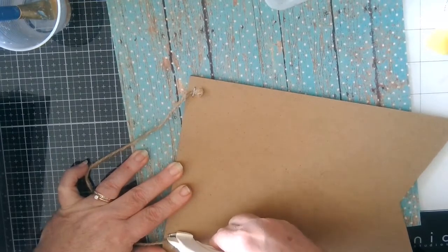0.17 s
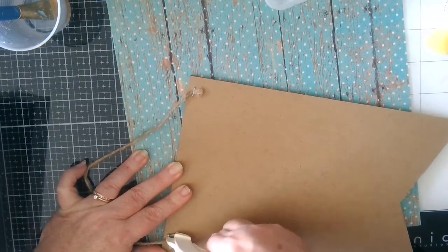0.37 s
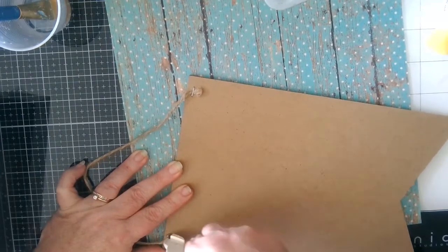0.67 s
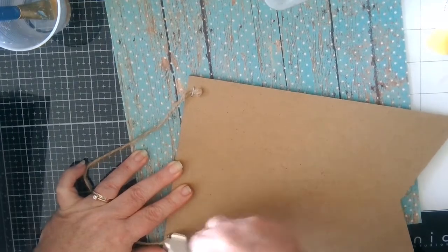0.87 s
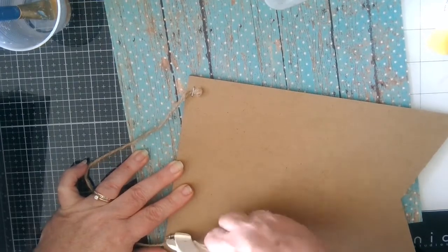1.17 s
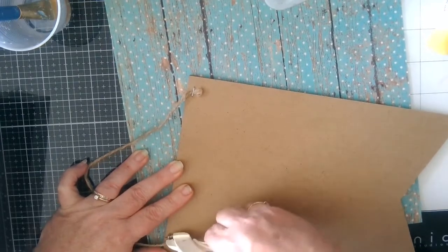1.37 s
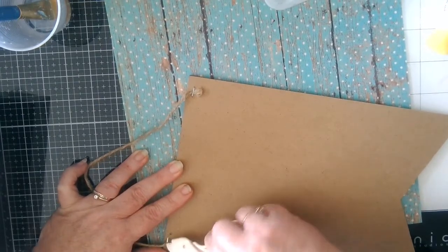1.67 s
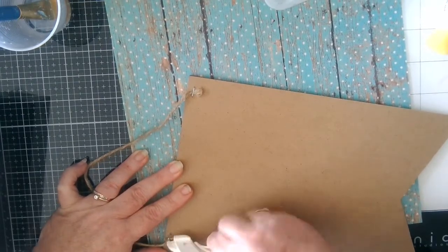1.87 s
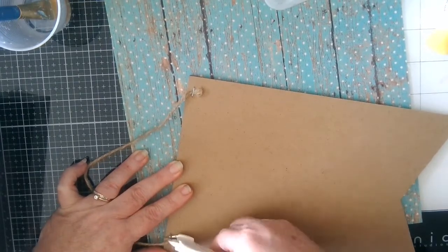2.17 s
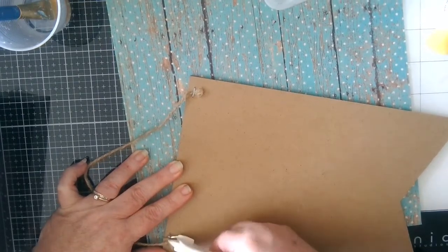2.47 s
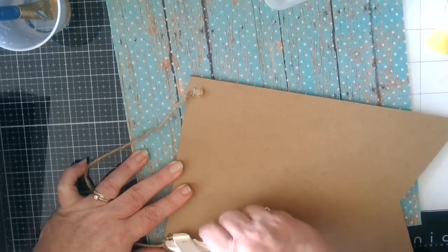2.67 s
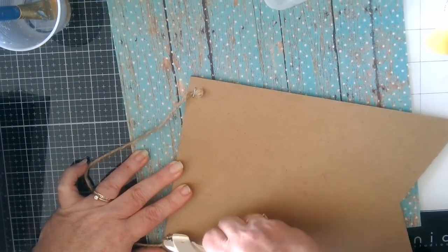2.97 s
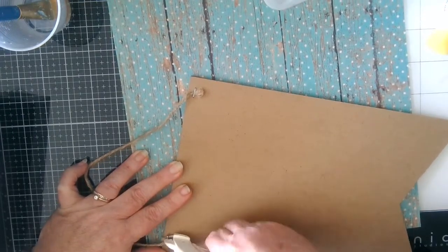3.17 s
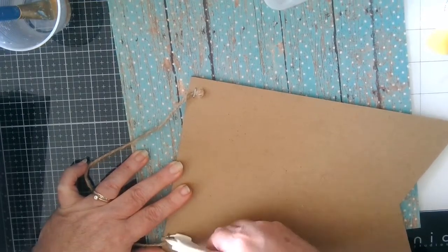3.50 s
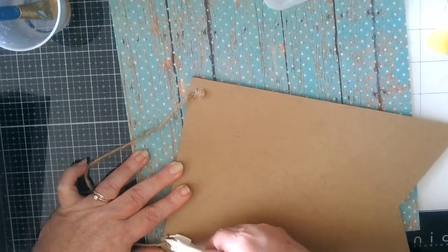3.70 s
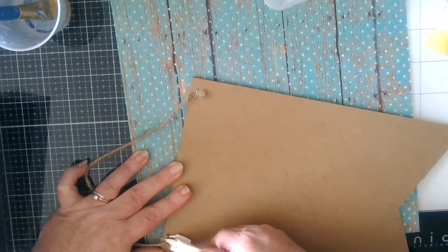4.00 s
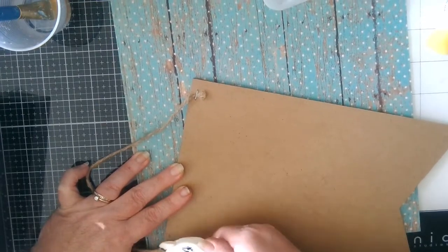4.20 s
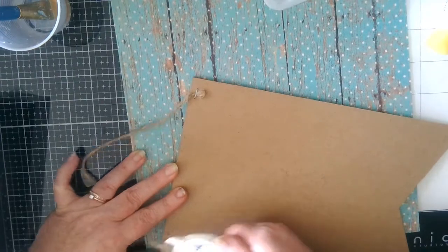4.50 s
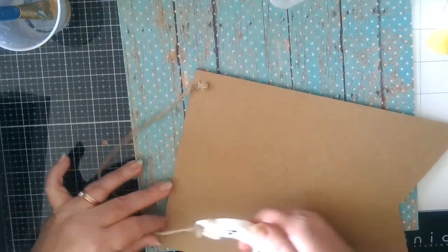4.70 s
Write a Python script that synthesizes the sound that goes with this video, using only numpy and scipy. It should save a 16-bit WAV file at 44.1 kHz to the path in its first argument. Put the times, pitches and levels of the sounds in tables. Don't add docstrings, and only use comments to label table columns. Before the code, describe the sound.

A metal hand tool knocks, taps and ticks against a thin board on a table, then a staple springs loose with one loud crack.

```python
import sys
import numpy as np
from scipy import signal
from scipy.fft import rfft, irfft, next_fast_len
from scipy.io import wavfile
from scipy.ndimage import map_coordinates

SR = 44100
rng = np.random.default_rng(int(sys.argv[2]) if len(sys.argv) > 2 else 0)


def unload_wav(signal):
    wavfile.write(
        sys.argv[1],
        SR,
        np.round(np.clip(np.atleast_2d(signal).T, -1, 1) * 32767).astype(np.int16),
    )


def ratio_of_db(decibels):
    return 10 ** (np.asarray(decibels, float) / 20)


N = 213796
T = np.arange(N) / SR


def unit(x):
    return x / np.sqrt(np.mean(x ** 2) + 1e-20)


def along(points, hz):
    point_hz, value = np.transpose(points)
    return np.interp(np.log(hz + 1), np.log(point_hz + 1), value)


def wobble(rate_hz):
    return map_coordinates(rng.standard_normal(int(N * rate_hz / SR) + 4), [T * rate_hz])


def filtered(x, response):
    size = next_fast_len(N + SR // 2)
    hz = np.fft.rfftfreq(size, 1 / SR)
    return irfft(rfft(x, size) * response(hz), size)[:N]


def resonant(x, peaks):
    def response(f):
        total = 0
        for k, (centre, width, db) in enumerate(peaks):
            damping = 1j * f * width
            total = total + (-1) ** k * ratio_of_db(db) * damping / (centre * centre - f * f + damping)
        return total
    return filtered(x, response)


def housing(x, peaks):
    return resonant(resonant(x, peaks), peaks)


def noise(spectrum):
    return unit(filtered(rng.standard_normal(N), lambda hz: ratio_of_db(along(spectrum, hz))))


def add(track, start_s, sound):
    part = track[round(start_s * SR):][:len(sound)]
    part += sound[:len(part)]


def strokes(rows, rest_db, rise_db_s, fall_db_s):
    levels = [np.full(N, rest_db)]
    for start_s, hold_s, db in rows:
        before_s = np.clip(start_s - T, 0, None)
        after_s = np.clip(T - start_s - hold_s, 0, None)
        levels.append(db - rise_db_s * before_s - fall_db_s * after_s)
    return np.max(levels, axis=0)


def burst(length_s):
    t = np.arange(SR // 8) / SR
    return rng.standard_normal(len(t)) * ratio_of_db(-15 * t / abs(length_s)) * (1 - np.exp(-t / .0005))


# pitch_hz, level_db, t60_s
BOARD_MODES = [(328, -3.5, 0.072), (460, -9, 0.017), (598.7, 0, 0.098), (689.4, 14.5, 0.035),
               (755, 5, 0.053), (863, 1, 0.15), (1020, 9, 0.058), (1020, -8.5, 0.032), (1280, -7.5, 0.12),
               (1870, -26, 0.067)]


def knock(centre_hz, thud_db, tilt_db):
    t = np.arange(SR // 5) / SR
    thump = np.sin(2 * np.pi * .92 * centre_hz * t) * (t / .00075) ** 2 * np.exp(-t / .00075)
    thump = thump + .6 * np.pad(thump, (round(.0072 * SR), 0))[:len(t)]
    ring = 0
    for hz, db, t60_s in BOARD_MODES:
        level_luck, phase_luck = rng.standard_normal(2)
        octaves_off = abs(np.log2(hz / centre_hz))
        mode_db = db + 4.28 * level_luck - tilt_db * octaves_off - 60 * t / t60_s
        ring = ring + ratio_of_db(mode_db) * np.sin(2 * np.pi * hz * t + 1.53 * phase_luck)
    blow = thump + 0.17 * ring * (1 - np.exp(-(t / 0.0015) ** 2))
    table = np.sin(2 * np.pi * 290 * t) + 0.36 * np.sin(2 * np.pi * 220 * t)
    table = ratio_of_db(thud_db - 60 * t / 0.14) * table * (1 - np.exp(-t / 0.00057))
    return blow / np.abs(blow).max() + table


# centre_hz, width_hz, level_db
HOUSING_BANDS = [(1630, 1100, -3), (3180, 510, -1), (4000, 274, 6), (5800, 320, -8), (7930, 600, -0.5),
                 (10594, 530, -4), (14800, 290, -11.5)]
# centre_hz, width_hz, level_db
OPEN_BANDS = [(12800, 2500, 0), (15000, 1500, -6)]


def steel_at_mic(dull, bright, thin):
    ringing = housing(dull, HOUSING_BANDS[:3]) + housing(bright, HOUSING_BANDS[3:5])
    ringing = ringing + housing(thin, HOUSING_BANDS[5:])
    return ringing - ratio_of_db(-25) * resonant(thin, OPEN_BANDS)


# start_s, steel_db, length_s, board_db, centre_hz
SNAP_HITS = [
    (4.0435, 2.5, 0.0061, -17, 690),
    (4.0488, -13.5, 0.0044, -9, 690),
    (4.0528, -0.5, 0.003, -8.5, 693),
    (4.056, -17, 0.011, -22, 702),
    (4.062, -14, 0.0052, -28.5, 695),
    (4.0747, -28, 0.053, -13, 760),
    (4.081, -34.5, 0.017, -15, 950),
    (4.092, -34, 0.013, -22.5, 700),
    (4.111, -35, 0.013, -48, 940),
]


def snap():
    wood, steel = np.zeros((2, N))
    for start_s, steel_db, length_s, board_db, centre_hz in SNAP_HITS:
        crack = ratio_of_db(steel_db + 7) * burst(length_s)
        add(steel, start_s, crack)
        add(wood, start_s, ratio_of_db(board_db) * knock(centre_hz, -22, tilt_db=13.5))
    return wood, steel_at_mic(ratio_of_db(-6.5) * steel, ratio_of_db(1.5) * steel, ratio_of_db(1.5) * steel)


# pitch_hz, level_db, t60_s
TABLE_TOP_MODES = [(62, -11.5, .2), (113, 0, 0.24), (171, 0, 0.23)]


def slam():
    t = np.clip(T - 4.05, 0, None)
    boom = sum(ratio_of_db(db - 60 * t / t60_s) * np.sin(2 * np.pi * hz * t) for hz, db, t60_s in TABLE_TOP_MODES)
    return ratio_of_db(-27.5) * boom * (1 - np.exp(-t / 0.002))


# start_s, peak_db, centre_hz, thud_db
FIRM_KNOCKS = [(0.2945, -28.5, 1020, -21), (0.415, -24, 987, -25), (0.532, -22.5, 960, -18.5),
               (0.595, -27.5, 1020, -24), (0.871, -32, 870, -12.5), (1.315, -29.5, 660, -21),
               (1.432, -19.5, 1007, -30), (1.541, -38.5, 960, -19), (2.541, -32.5, 980, -30),
               (2.717, -18.5, 1020, -31), (2.909, -35, 1060, -19), (2.942, -35.5, 977, -12),
               (2.961, -33, 990, -16), (3.187, -24, 798, -26), (3.374, -24.5, 848, -16),
               (3.831, -34, 738, -12.5)]
# start_s, peak_db
LIGHT_TAPS = [(0.018, -51), (0.057, -41), (0.093, -40), (0.121, -37.5), (0.141, -41), (0.179, -42),
              (0.221, -42.5), (0.447, -59), (0.939, -41), (1.048, -36.5), (1.501, -39), (1.656, -44),
              (1.784, -41.5), (1.912, -39), (2.523, -43), (2.552, -34.5), (2.622, -35.5), (2.986, -33),
              (3.034, -35.5), (3.567, -43.5), (3.604, -40.5), (3.706, -38), (3.904, -37.5), (3.946, -34),
              (4.014, -36.5), (4.634, -34)]


def blows():
    tap_hz, tap_thud_db, tap_tilt_db, knock_tilt_db = 744, -18.5, 9.5, 3.5
    rows = [(*row, knock_tilt_db) for row in FIRM_KNOCKS]
    rows += [(start_s, db, tap_hz, tap_thud_db, tap_tilt_db) for start_s, db in LIGHT_TAPS]
    wood, sharp = np.zeros((2, N))
    for start_s, db, centre_hz, thud_db, tilt_db in rows:
        edge = ratio_of_db(1.5 * (db + 30) - 45) * burst(.0025)
        add(sharp, start_s + 0.00022, edge)
        add(wood, start_s - .0004, ratio_of_db(db - 6.5) * knock(centre_hz, thud_db + 1.0, tilt_db))
    return wood + housing(sharp, [(1750, 600, -1), (3550, 1100, 0), (7850, 700, -6)])


# start_s, peak_db, thinness_db
SHORT_TICKS = [(0.2544, -53.5, 3), (0.9038, -45.5, 8), (0.92, -41.5, 7), (0.926, -45, 7), (0.9357, -37, 14),
               (0.945, -43, 10), (0.9613, -41.5, -8), (1.2436, -56, 19.5), (1.3135, -40.5, 6),
               (1.4646, -51, 14), (1.5007, -51, 18), (1.5093, -47.5, 2), (1.5346, -38, 11.5),
               (1.5574, -45, 4), (1.5918, -46, 8), (1.6085, -44.5, 7), (1.9088, -46.5, 4), (1.9237, -57, 7),
               (2.5356, -48, -20), (2.9828, -34.5, -13), (3.7044, -64, 19), (3.8293, -46, 3),
               (3.9022, -49, 3), (3.945, -47.5, 8), (4.0116, -48, 0), (4.241, -46, 9), (4.6286, -40, -12)]
# start_s, peak_db, thinness_db, length_s
STAPLE_LANDS = [
    (4.1445, -31, 10, .016),
]


def ticks():
    tick_s, dull_db, dull_per_thin = .0055, -10, -.3
    dull, bright, thin = np.zeros((3, N))
    for start_s, db, thin_db, length_s in [(*row, tick_s) for row in SHORT_TICKS] + list(STAPLE_LANDS):
        tick = ratio_of_db(db + 8) * burst(length_s)
        add(bright, start_s, tick)
        add(dull, start_s, ratio_of_db(dull_db + dull_per_thin * thin_db) * tick)
        add(thin, start_s, ratio_of_db(thin_db + 2.5) * tick)
    return steel_at_mic(dull, bright, thin)


# start_s, hold_s, level_db
WOOD_RUBS = [(0, 0.013, -55), (.23, 0.018, -59.5), (.28, 0.023, -62), (.57, 0.023, -55.5),
             (.89, 0.043, -59), (1.47, 0.1, -56), (1.68, 0.13, -60), (2.21, 0.034, -57.5),
             (2.55, 0.062, -55), (2.76, 0.031, -53), (2.92, .05, -50.5), (3.02, 0.22, -56),
             (3.41, 0.078, -54), (3.89, 0.034, -61.5), (4.2, 0.12, -63), (4.65, .03, -61)]


def rubbing():
    slips = rng.standard_normal(N) * ratio_of_db(2.5 * wobble(90) + 1.5 * wobble(25))
    level_db = strokes(WOOD_RUBS, rest_db=-69.5, rise_db_s=138, fall_db_s=98)
    body = [(480, 160, -3), (690, 260, 0), (960, 400, -1.5)]
    return ratio_of_db(level_db - 4) * unit(housing(slips, body))


# start_s, hold_s, level_db
STEEL_SCRAPES = [(.94, 0.011, -53), (1, 0.19, -64), (1.31, 0.017, -60), (1.495, 0.028, -57),
                 (1.54, 0.048, -58.5), (1.91, 0.018, -63), (2.54, 0.02, -62), (2.58, 0.045, -62.5),
                 (2.74, 0.021, -60), (2.95, 0.032, -56.5), (3.19, 0.0076, -63), (4.12, .16, -64.5),
                 (4.46, .03, -64), (4.61, .03, -58), (4.68, .17, -62)]


def scraping():
    grains = rng.standard_normal(N) * ratio_of_db(3 * wobble(160) + 1.2 * wobble(30))
    level_db = strokes(STEEL_SCRAPES, rest_db=-71.5, rise_db_s=277, fall_db_s=193)
    edge = [(4000, 500, -8), (7850, 500, -4), (10800, 700, 0), (14000, 3000, -8)]
    return ratio_of_db(1.09 * level_db - 0.5) * unit(housing(grains, edge))


# pitch_hz, t60_s
ROOM_DECAY = [(100, 0.45), (700, 0.2), (4000, 0.22), (8000, 0.12), (14000, 0.05)]


def room(x):
    hz, t, z = signal.stft(rng.standard_normal(SR // 2), SR, nperseg=256)
    decay = ratio_of_db(-60 * t / along(ROOM_DECAY, hz)[:, None])
    tail = signal.istft(z * decay, SR, nperseg=256)[1]
    delayed = np.pad(x, (350, 0))
    return signal.fftconvolve(delayed, tail / np.linalg.norm(tail))[:N]


# start_s, hold_s, level_db
NOTE_SURGES = [
    (.05, 0.045, -49.5),
    (2.85, .06, -62),
]
# centre_hz, width_hz, level_db
HUM_BANDS = [(213, 2.8, 1.5), (310, 65, -9), (454, 40, -11)]


def appliance():
    phase = 2 * np.pi * np.cumsum(120 + 3.2 * wobble(6.0)) / SR
    note_db = strokes(NOTE_SURGES, rest_db=-63, rise_db_s=80, fall_db_s=200)
    note_db = note_db + 2.4 * wobble(3.2) + 2.3 * wobble(4.2)
    note = ratio_of_db(note_db) * (np.sin(phase) + ratio_of_db(-11) * np.sin(2 * phase))
    hum = ratio_of_db(-67 + 1.5 * wobble(2.1)) * unit(resonant(rng.standard_normal(N), HUM_BANDS))
    return note + hum


# pitch_hz, density_db_per_hz
AIR_SPECTRUM = [(15, -30), (25, 1), (54, -3.5), (92, -8), (123, -10), (214, -11), (314, -27.5),
                (678, -18.5), (893, -39.5), (1010, -25), (2000, -50.5), (2600, -65.5), (4400, -120)]


def air():
    bands = unit(housing(rng.standard_normal(N), [(4000, 500, 0), (7900, 500, 0), (10900, 900, -1)]))
    return ratio_of_db(-76) * bands + ratio_of_db(-57.5 + 1.3 * wobble(3)) * noise(AIR_SPECTRUM)


def scene():
    wood = blows()
    steel = ticks()
    snap_wood, snap_steel = snap()
    wood, steel = wood + snap_wood, steel + snap_steel
    echo = room(ratio_of_db(-12.5) * wood + ratio_of_db(-11) * steel)
    mix = wood + steel + echo + slam() + rubbing() + scraping() + appliance() + air()
    return mix[None]


# pitch_hz, density_db_per_hz
HISS_SPECTRUM = [(300, -14), (1200, 4), (5000, 1), (12000, -3.5), (15800, -2)]
# pitch_hz, level_db
WHISTLES = [(8000, -84), (8400, -78.5), (12200, -85), (12600, -90)]
# start_s, peak_db
SPIT_CLICKS = [(0.084, -39.5), (0.4478, -34.5), (0.7419, -38), (4.2988, -39.5), (4.7065, -42)]


def electronics():
    frame = (T * 25 + .3) % 1
    chop = np.clip(6 * (.42 - np.abs(frame - .5)), .15, 1)
    tones = sum(ratio_of_db(db + 6.5) * np.sin(2 * np.pi * hz * T) for hz, db in WHISTLES)
    spits = np.zeros(N)
    for start_s, db in SPIT_CLICKS:
        spits[round(start_s * SR)] = ratio_of_db(db + 3)
    return ratio_of_db(-67.0) * noise(HISS_SPECTRUM), chop * tones + spits


# centre_s, length_s, depth_db
HISS_MUTES = [(1.001, 0.012, -19), (1.34, 0.015, -24), (2.598, 0.011, -16), (2.877, 0.016, -18),
              (3.217, 0.015, -28), (3.264, 0.01, -18), (3.391, 0.021, -24), (3.432, 0.015, -17),
              (3.56, 0.009, -9), (3.647, 0.016, -18), (4.007, 0.011, -17), (4.117, .012, -12),
              (4.765, .024, -28)]


def muting():
    return sum(db * np.clip(1.5 - np.abs(T - centre_s) / (.45 * length_s), 0, 1)
               for centre_s, length_s, db in HISS_MUTES)


def band_limit(x):
    return signal.sosfilt(signal.butter(12, 16810, fs=SR, output="sos"), x)


def record(dry):
    hiss, marks = electronics()
    mute_db = muting()
    treble = filtered(dry[0], lambda hz: np.clip(hz / 400 - 3, 0, 1))
    low = dry[0] - treble
    mix = low + ratio_of_db(.4 * mute_db) * treble + ratio_of_db(mute_db) * hiss + marks
    top_hz, over_top_db = 15830, -24
    mix = filtered(mix, lambda hz: np.where(hz < top_hz, 1, ratio_of_db(over_top_db)))
    return band_limit(mix[None])


dry = scene()
out = record(dry)
unload_wav(out)
```